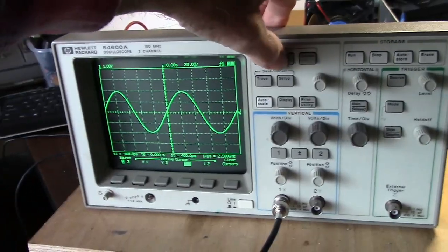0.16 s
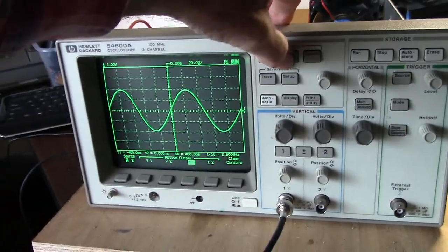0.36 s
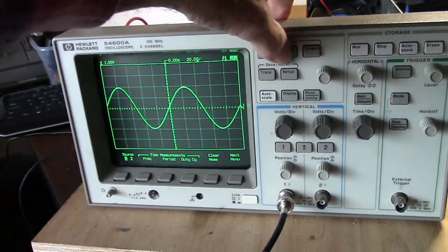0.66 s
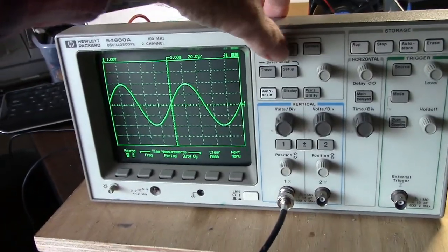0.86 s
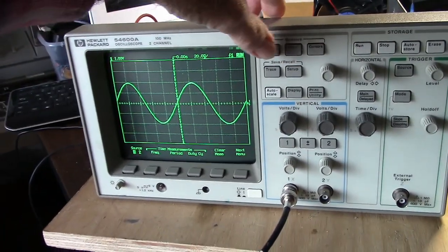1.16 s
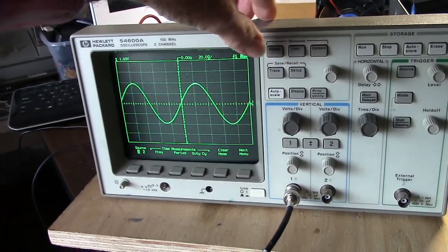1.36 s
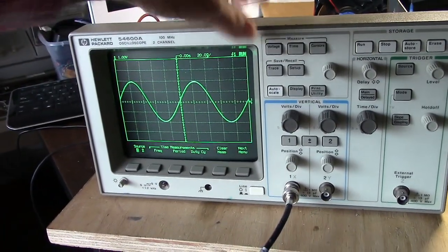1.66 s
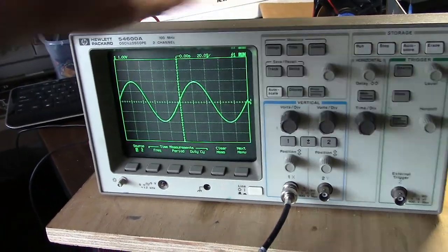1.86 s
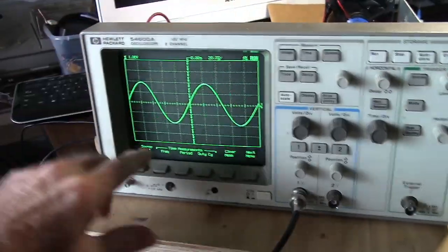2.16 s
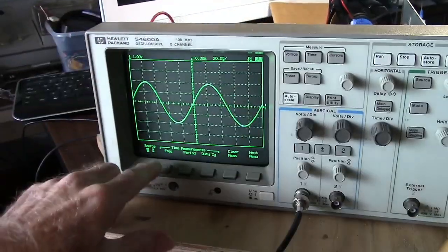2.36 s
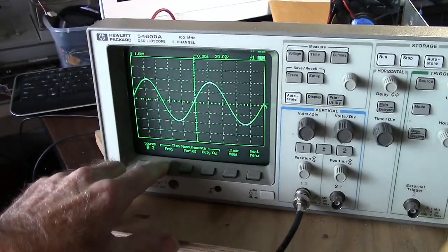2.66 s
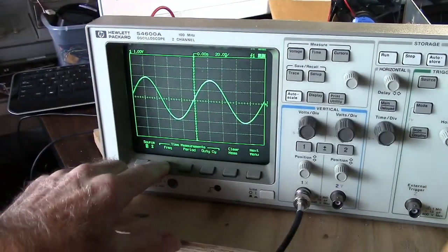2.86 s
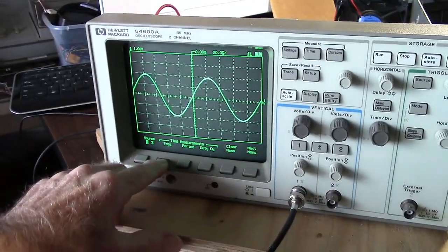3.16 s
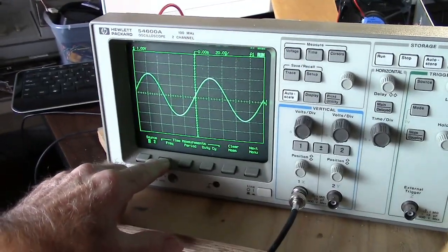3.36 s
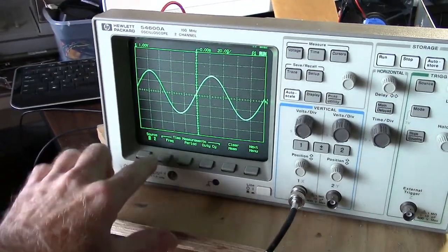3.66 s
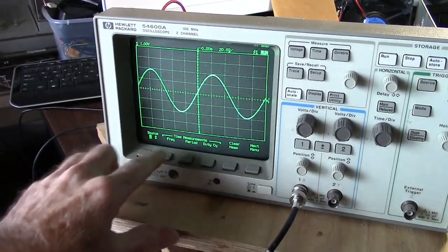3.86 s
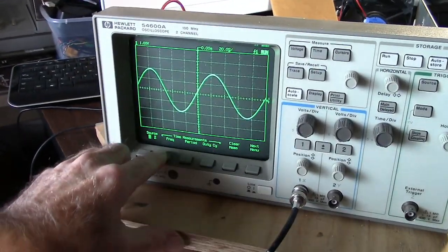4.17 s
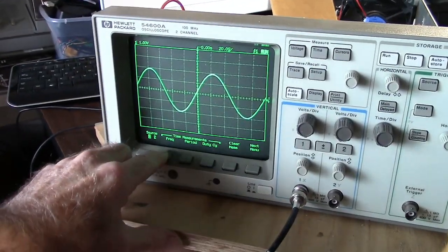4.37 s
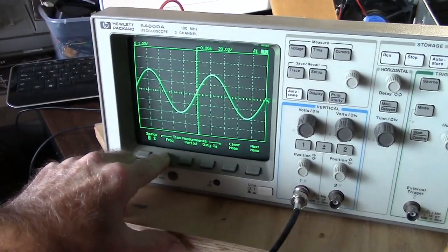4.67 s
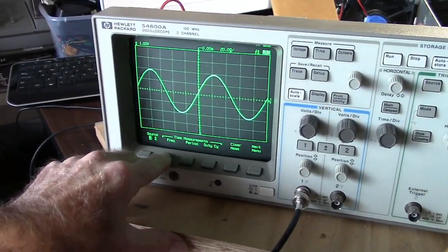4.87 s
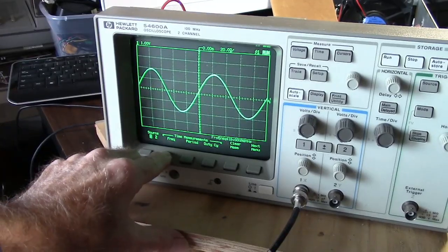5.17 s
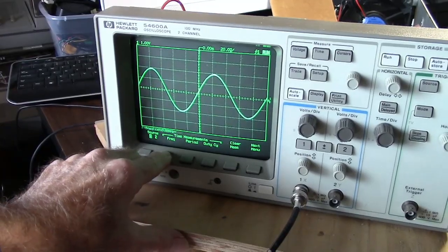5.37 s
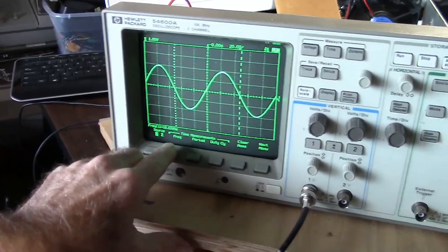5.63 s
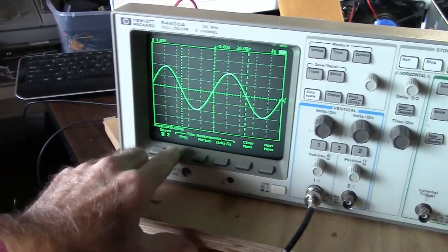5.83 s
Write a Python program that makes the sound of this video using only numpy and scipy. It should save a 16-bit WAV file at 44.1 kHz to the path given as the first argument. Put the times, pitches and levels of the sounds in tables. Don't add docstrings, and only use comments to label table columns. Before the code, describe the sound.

In a small, fairly dry workshop, a close camera microphone picks up a bench instrument's steady fan hum and faint high pulsing lens-motor whine. Sparse soft key clicks and skin rubs come first, then a palm settling with a tiny rubber squeak and a firm press. Knuckles knock and scrape the hollow case, light presses follow, and one key snaps very loudly near the end.

```python
import sys
import numpy as np
from scipy import signal
from scipy.fft import rfft, irfft
from scipy.io import wavfile
from scipy.ndimage import uniform_filter1d

SR = 44100
rng = np.random.default_rng(int(sys.argv[2]) if len(sys.argv) > 2 else 0)


def dump_mix(stems):
    frames = np.atleast_2d(stems).T
    limited = np.clip(frames, -1, 1)
    pcm = np.round(limited * 32767).astype(np.int16)
    wavfile.write(sys.argv[1], SR, pcm)


def rack_gain(trim_db):
    fader = np.asarray(trim_db, float)
    return 10 ** (fader / 20)


N = 264600

# freq_hz, likeness [0-1]
LIKENESS = [(25, 0.58), (60, 1), (180, 0.8), (550, 0.76), (1650, 0.87), (4970, 0.82), (15000, 0.92)]
# freq_hz, level_db, t60_s
CASE_MODES = [(208, -12, 0.074), (285, -31, 0.039), (316, -10.5, 0.16), (400, -17.5, 0.093),
              (470, -1, 0.051), (557, -11, 0.035), (540, 7, 0.092), (592, -1, 0.062), (652, 5, 0.019),
              (680, 1.5, 0.059), (909, 2, 0.064)]
# freq_hz, level_db, t60_s
KEY_MODES = [(722, -9, 0.037), (955, -0.5, 0.11), (1057, 3, 0.075), (1203, 0.5, 0.11), (1270, 4.5, 0.057),
             (1362, 9, 0.028), (1422, 1.5, 0.017), (1694, 4.5, 0.081), (1940, 5, 0.03), (1890, 12, 0.031),
             (2310.4, -20, 0.049), (3000, -10, 0.016), (3200, -23, 0.045)]


def evened(x):
    return x / np.sqrt(np.mean(x ** 2) + 1e-20)


def read(points, hz):
    f, value = np.transpose(points)
    return np.interp(np.log(hz + 1), np.log(f + 1), value)


def follow(rows):
    s, *columns = np.transpose(rows)
    return [np.interp(np.arange(N) / SR, s, c) for c in columns]


def drift(hz):
    t = np.arange(0, N + 400, 400) / SR
    slow = np.zeros(len(t))
    for f in np.geomspace(hz / 20, hz, num=12):
        slow += np.sin(2 * np.pi * (f * t + rng.random())) / np.sqrt(f)
    return np.interp(np.arange(N) / SR, t, evened(slow))


def strokes(rows):
    skew, roundness = 0.86, 0.94
    gain = np.zeros(N)
    for start_s, length_s, level_db in rows:
        u = np.linspace(0, 1, round(length_s * SR))
        arch = abs(np.sin(np.pi * u ** skew)) ** roundness
        gain[round(start_s * SR):][:len(u)] += rack_gain(level_db) * arch
    return gain


def ring(modes):
    t = np.arange(SR // 4) / SR
    out = np.zeros(len(t))
    for hz, level_db, t60_s in modes:
        out += rack_gain(level_db - 60 * t / t60_s) * np.sin(2 * np.pi * hz * t)
    return out / np.linalg.norm(out)


def coloured(shape, patchy_db):
    frames, hz = N // 256 + 5, np.fft.rfftfreq(1024, 1 / SR)
    a, b, c, d, patches = rng.standard_normal((frames, 513, 5)).T
    patches = uniform_filter1d(patches, size=12, axis=0)
    patches = evened(uniform_filter1d(patches, size=14, axis=1))
    mid = a + 1j * b
    side_gain = np.sqrt((1 - np.clip(read(LIKENESS, hz), 0, 1)) / 2)
    side = side_gain[:, None] * (c + 1j * d)
    z = np.array([mid + side, mid - side]) * rack_gain(read(shape, hz)[:, None] + patchy_db * patches)
    return evened(signal.istft(z, nperseg=1024, noverlap=768)[1][:, :N])


def causal(db):
    log_gain = np.log(rack_gain(np.concatenate([db, db[-2:0:-1]])))
    return np.exp(np.conj(signal.hilbert(log_gain)))[:len(db)]


def high_pass(x, hz):
    return signal.sosfilt(signal.butter(4, hz, "high", fs=SR, output="sos"), x)


def room(x):
    # freq_hz, t60_s
    decay = [(200, 0.21), (500, 0.096), (1200, 0.15), (3000, 0.16), (6000, 0.16), (10000, 0.14)]
    # freq_hz, gain_db
    wall_return = [(300, 8), (1200, 4.5), (3000, 3), (6000, 1.5), (10000, -22.5)]
    echo_advance_samples = 120
    size = SR // 2
    taps = np.zeros((2, size))
    at = np.arange(200, size - 20, 20) + rng.integers(0, 20, (2, (size - 201) // 20))
    np.put_along_axis(taps, at - echo_advance_samples, rng.choice([-1., 1.], at.shape), 1)
    hz, t, z = signal.stft(taps, SR, nperseg=256)
    gain_db = read(wall_return, hz)[:, None] - 60 * t / read(decay, hz)[:, None]
    mid, side = signal.istft(z * rack_gain(gain_db), SR, nperseg=256)[1]
    tail = np.array([mid + 0.063 * side, mid - 0.13 * side]) / np.linalg.norm(mid)
    return signal.fftconvolve(x[None], tail, axes=1)[:, :N]


def fan():
    # time_s, freq_hz
    speed = [(0.0, 1396), (0.12, 1397), (3.64, 1394), (5.88, 1404), (6.0, 1394)]
    # freq_hz, level_db
    tones = [(242.2, -57), (279.9, -69.5), (419.9, -59.5), (489.9, -63.5), (732.1, -67), (802.1, -74),
             (839.8, -69), (979.8, -65), (1114, -84.5), (1152, -77), (1222, -74.5), (1260, -64.5),
             (1292, -67), (1324, -67), (1362, -70), (1394, -56), (1432, -88), (1464, -118), (1502, -69.5),
             (1534, -65), (1572, -72), (1674, -78), (1712, -71.5), (1744, -78.5), (1976, -98), (2164, -84),
             (2406, -78), (2552, -83), (2756, -105.5), (2794, -88)]
    # time_s, level_db
    opening = [(0.0, 1.5), (0.75, 1), (1.6, 0.7), (2.2, -0.3), (2.5, 0.5), (3.1, .2), (3.95, 1.5),
               (4.4, -0.7), (4.9, -3.5), (5.4, 0.8), (6.0, -1.5)]
    shaded = {7: 1.05, 12: 0.9, 21: -0.8}
    # level_db, waver_hz
    mains_db, waver_hz = (-71, 9)
    # freq_hz, density_db
    air_shape = [(22, -74), (60, -21), (105, -6.5), (150, -7), (300, -6), (500, -5.5), (700, -9),
                 (1000, -11.5), (1400, -11), (1900, -16), (3500, -20.5), (6000, -27), (12500, -33),
                 (16000, -43)]
    air_db, mains_hz = -55.5, 120

    shaft_hz = follow(speed)[0] / 40
    turns = np.cumsum(shaft_hz) / SR
    opening_db = follow(opening)[0]
    hum = np.zeros(N)
    for hz, tone_db in tones:
        order = round(hz / shaft_hz.mean())
        level_db = tone_db + 1.1 * drift(3) + shaded.get(order, 0) * opening_db
        cycles = order * turns + rng.random() + 0.057 * drift(3.5)
        hum += np.sqrt(2) * rack_gain(level_db) * np.sin(2 * np.pi * cycles)
    mains_gain = np.sqrt(2) * rack_gain(mains_db + 1.9 * drift(waver_hz))
    mains_cycles = mains_hz * np.arange(N) / SR + 0.6 * drift(waver_hz)
    hum += mains_gain * np.sin(2 * np.pi * mains_cycles)
    swell_db = 0.4 * drift(2)
    return hum + rack_gain(air_db + swell_db) * coloured(air_shape, patchy_db=1.0)


def lens():
    # first_s, last_s, burst_length_s, level_db
    runs = [(0, 0, .065, 0), (.2, .334, .067, -4), (.467, .467, .1, -4), (.667, .801, .067, 0),
            (.934, .934, .067, -3), (1.068, 1.068, .133, 0), (1.268, 3.4, .067, 0), (3.537, 3.8, .067, -4),
            (3.937, 4.471, .067, 0), (4.671, 4.671, .067, -1), (4.805, 4.805, .133, 0),
            (5.005, 5.94, .067, 0)]
    pitch_hz, fuzz_hz, level_db = 5560, 6, -73.5
    period_s = 4 / 29.97
    gate = np.zeros(N)
    for first_s, last_s, length_s, db in runs:
        for s in np.arange(first_s, last_s + period_s / 2, period_s) * 0.9992:
            gate[round(s * SR):round((s + length_s) * SR)] = rack_gain(level_db + db)
    pitch = pitch_hz + fuzz_hz * drift(50)
    return np.sqrt(2) * uniform_filter1d(gate, size=60) * np.sin(2 * np.pi * np.cumsum(pitch) / SR)


def leans():
    # time_s, level_db
    pushes = [
        (2.244, -48),
        (2.303, -44),
        (2.35, -46),
        (2.398, -44),
        (3.808, -36.5),
        (3.822, -43),
    ]
    # freq_hz, level_db, t60_s
    bench_modes = [(141, -2, 0.023), (203, 2, 0.12), (268, 4, 0.086)]
    drive = np.zeros(N)
    for s, level_db in pushes:
        at = round(s * SR)
        drive[at:at + 120] += rack_gain(level_db) * np.hanning(120)
    return rack_gain(-13) * high_pass(signal.oaconvolve(drive, ring(bench_modes))[:N], 105)


def rub():
    # start_s, length_s, level_db, extra_top_db
    slides = [(0.463, .042, -59, -22), (.95, 0.34, -61.5, -3), (1.25, .31, -66, -1), (2.31, .12, -68, -8),
              (2.979, 0.037, -58.5, 2.5), (3.1, 0.21, -65, -5), (3.472, 0.098, -61, 2.5),
              (3.545, 0.037, -52.5, -1), (3.815, 0.092, -52, -1), (3.905, 0.065, -57, -3),
              (4.05, 0.17, -60.5, -5), (4.49, .08, -64, 2.5), (4.6, 0.11, -66, -1), (4.95, .1, -67, -3),
              (5.44, .07, -62, -6)]
    # freq_hz, density_db
    skin_shape = [(700, -27), (1200, -6), (2000, -2), (3500, -3), (5000, -12.5), (6300, -7), (9500, -12.5),
                  (13000, -17), (16000, -30)]
    dry_top_hz = 5000
    grit = 1 + 0.5 * uniform_filter1d(rng.exponential(1, N) ** 2, size=40)
    hiss = evened(grit * coloured(skin_shape, patchy_db=1.5))
    top = signal.sosfiltfilt(signal.butter(2, dry_top_hz, "high", fs=SR, output="sos"), hiss)
    body_gain = strokes([(s, length, db) for s, length, db, _ in slides])
    top_gain = strokes([(s, length, db + top_db) for s, length, db, top_db in slides])
    return body_gain * (hiss - top) + top_gain * top


def squeaks():
    # start_s, length_s, first_hz, last_hz, level_db
    glides = [
        (2.28, .052, 6350, 6800, -70),
        (2.336, 0.039, 6120, 6370, -63),
        (2.357, .06, 6170, 6300, -68),
    ]
    out = np.zeros(N)
    for s, length_s, first_hz, last_hz, level_db in glides:
        glide_hz = np.interp(np.arange(N) / SR, (s, s + length_s), (first_hz, last_hz))
        pitch = glide_hz * (1 + 0.008 * drift(50))
        out += strokes([(s, length_s, level_db)]) * np.sin(2 * np.pi * np.cumsum(pitch) / SR)
    return np.sqrt(2) * out


def drag():
    # start_s, length_s, level_db
    drags = [
        (2.99, 0.065, -58),
        (3.07, 0.23, -58),
        (3.815, .03, -41),
        (3.84, 0.034, -37),
        (3.868, 0.027, -40),
        (3.912, 0.029, -44.5),
        (3.932, .04, -44.5),
        (3.975, 0.018, -49),
        (4.11, 0.1, -55),
    ]
    slips_per_s = 1500
    force = rack_gain(2.5 * rng.exponential(1, N)) * rng.choice([-1, 1], N)
    slips = force * (rng.random(N) < slips_per_s / SR)
    return signal.oaconvolve(strokes(drags) * evened(slips), ring(CASE_MODES) + 0.11 * ring(KEY_MODES))[:N]


def blows():
    # time_s, key_db, case_db, tick_db, snap_share (1 key snap, 0 knuckle tap, over 1 thinner)
    contacts = [(0.4738, -40, -64, -58.5, 1.5), (.484, -36, -66, -53, 0.017),
                (1.6974, -36, -38.5, -60, 0.4), (1.915, -52, -64, -55.5, 0.2),
                (2.3005, -32, -39, -45.5, 0.17), (2.303, -26, -26, -52, 0.4), (2.678, -44, -52, -50, 0.3),
                (2.8263, -20, -48, -43.5, 0.83), (2.841, -34, -57, -58, 0.3), (2.992, -47, -46, -60, 0.95),
                (3.01, -36, -39.5, -68, .45), (3.088, -37, -46, -55, 0.05), (3.5517, -29.5, -43, -44, 1.55),
                (3.5617, -52, -42.5, -46.5, 0.97), (3.806, -25, -19.5, -37.5, 0.05),
                (3.8079, -53, -17, -32.5, 0.1), (4.319, -37, -45, -65, .4), (4.522, -32.5, -50, -55, 1.1),
                (5.47, -36, -41, -58, 0.25), (5.5641, -53, -29.5, -37, 0.65), (5.5666, -9, -24, -20, 1.02),
                (5.5682, -7, -35, -30, 0.19)]
    # freq_hz, density_db
    snap_shape = [(1500, -49.5), (2500, 2.5), (3300, 4), (4100, -4), (4800, 6), (5600, 0.5), (6400, 3),
                  (7300, 0.5), (8200, 7), (9200, -3), (12000, -12), (16000, -34)]
    # freq_hz, density_db
    tap_shape = [(1200, -24), (2000, 13.5), (2700, 9.5), (3200, -0.5), (3700, 6.5), (4500, -11.5),
                 (6000, -13.5), (10000, -20.5), (16000, -37)]
    contact_s = 1.796 / 1000
    grit_even = 0.78
    key_bass_cut_hz = 685

    key, case, tick = np.zeros((3, N + 512))
    hz = np.fft.rfftfreq(512, 1 / SR)
    u = np.arange(512) / SR / contact_s
    push = np.sin(np.pi * np.minimum(2.61 * u, 1)) ** 2
    crack = 0.5 * np.sinc(SR * contact_s * (u - 0.25))
    for s, key_db, case_db, tick_db, share in contacts:
        snap = rng.standard_normal(512) * u * np.exp(-3.5 * u) + crack
        share = np.clip(share, 0, 1.6)
        colour = causal(share * read(snap_shape, hz) + (1 - share) * read(tap_shape, hz))
        spectrum = rfft(snap)
        bright = irfft(spectrum / abs(spectrum) ** grit_even * colour)
        bright = bright * np.hanning(1024)[512:]
        rough = push + 0.35 * snap
        at = round(s * SR)
        for lane, force, db in ((key, rough, key_db), (case, push, case_db), (tick, bright, tick_db)):
            lane[at:at + 512] += rack_gain(db) * force / np.linalg.norm(force)
    key_ring = signal.oaconvolve(key, high_pass(ring(KEY_MODES), key_bass_cut_hz))
    case_ring = signal.oaconvolve(case, ring(CASE_MODES))
    return rack_gain(2.5) * key_ring[:N] + rack_gain(6) * case_ring[:N] + rack_gain(20) * tick[:N]


def scene():
    hand_bass_cut_hz = 216
    hand = high_pass(blows() + drag(), hand_bass_cut_hz) + leans()
    direct = hand * rack_gain(np.array([[0.2], [-0.2]]))
    return direct + rack_gain(-12.5) * room(hand) + rub() + squeaks() + lens() + fan()


def low_pass(x):
    return signal.sosfilt(signal.butter(12, 15750, fs=SR, output="sos"), x)


def record(dry):
    edge = signal.firwin(numtaps=255, cutoff=16200, fs=SR)
    limited = signal.oaconvolve(dry, edge[None], "same")
    return low_pass(limited)


dry = scene()
out = record(dry)
dump_mix(out)
```